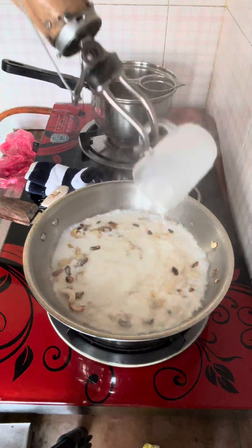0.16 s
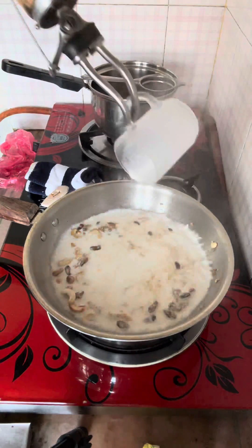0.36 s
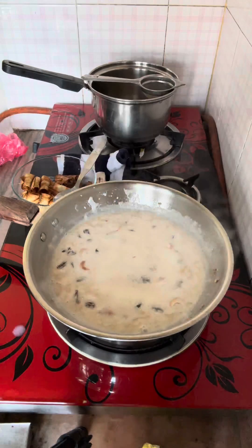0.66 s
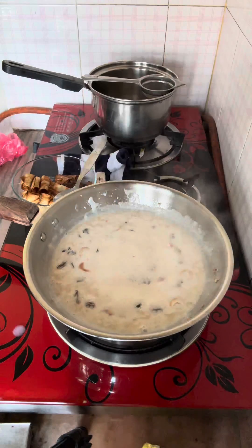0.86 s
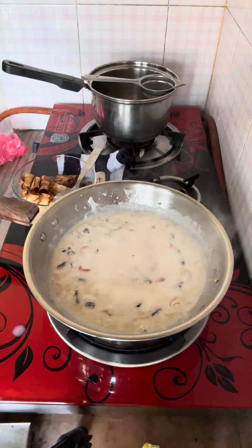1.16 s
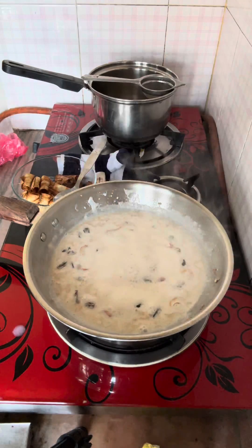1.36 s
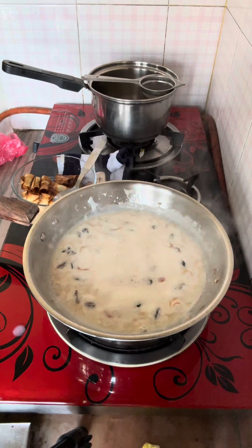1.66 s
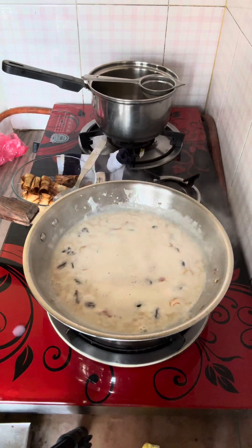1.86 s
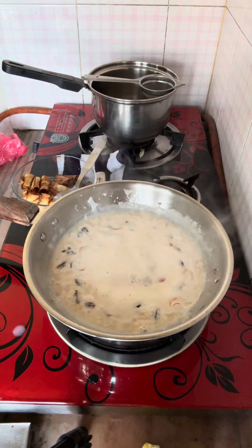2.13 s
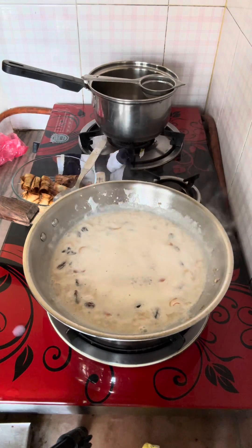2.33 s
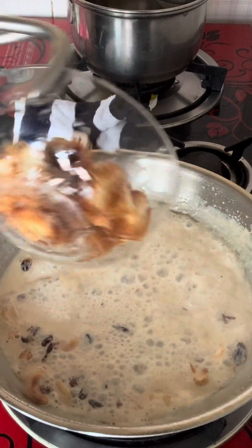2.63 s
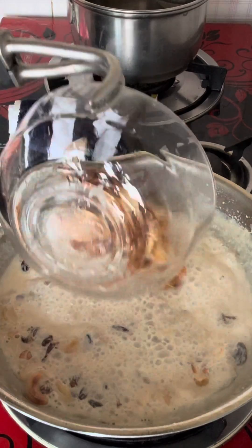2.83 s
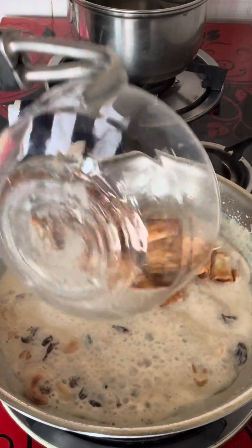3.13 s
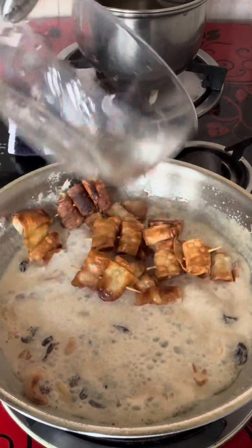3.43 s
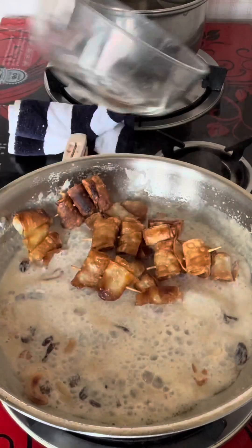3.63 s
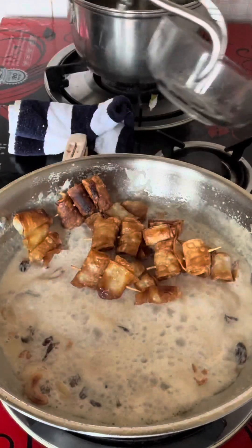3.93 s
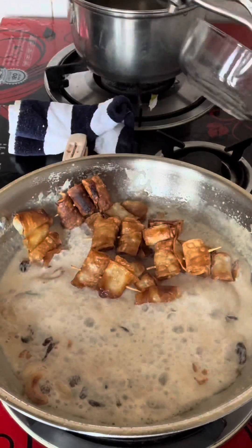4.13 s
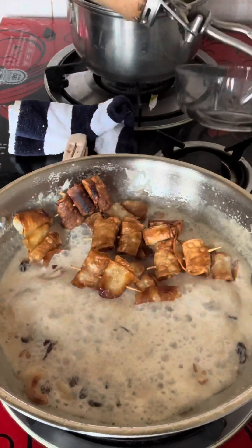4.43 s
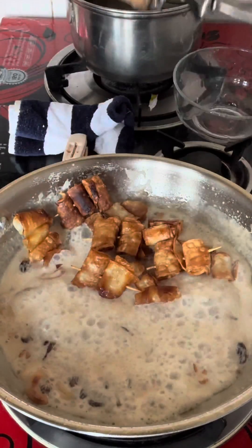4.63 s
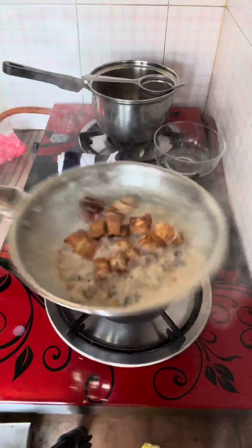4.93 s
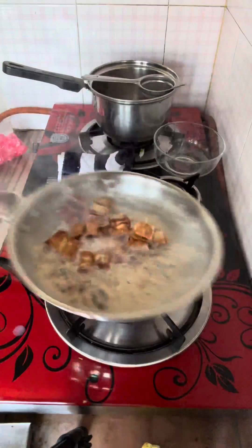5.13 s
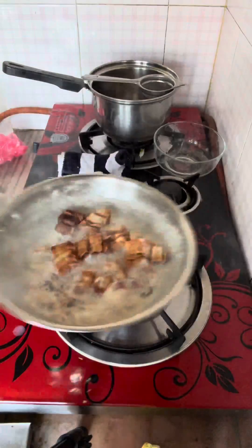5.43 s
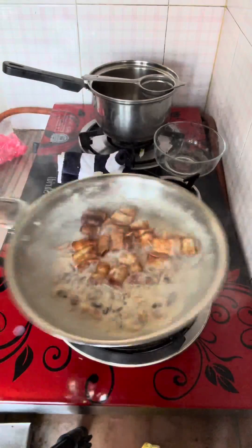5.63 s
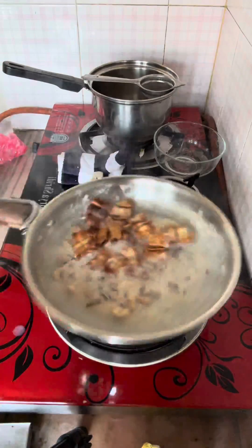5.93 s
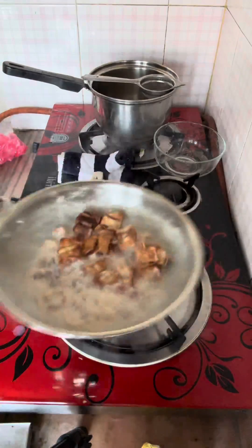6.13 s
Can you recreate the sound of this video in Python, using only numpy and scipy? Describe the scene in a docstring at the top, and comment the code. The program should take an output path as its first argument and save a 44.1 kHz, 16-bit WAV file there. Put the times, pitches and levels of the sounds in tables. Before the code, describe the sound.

Brief frying hiss, far thuds and drags, pieces knocking a glass bowl, very loud ringing set-down, then sloshing and a metal pan slamming on the stove.

```python
"""A bowl is set down hard by a steel grip and rings, after fried pieces slide out of it; in a home kitchen, four shots.
Blows are noisy contacts plus decaying modes, answered by a small hard room; a pan also bangs on the burner.
Dull knocks and drags on a far counter are softer blows and gritty noise; milk hisses in a hot pan as noise,
ticks and damped sines. Appliances hum in narrow noise bands, a vehicle revs outside as unsteady sine orders,
and the loudest blows overload the microphone."""
import sys
import numpy as np
from scipy import signal
from scipy.fft import rfft, irfft, next_fast_len
from scipy.io import wavfile
from scipy.ndimage import uniform_filter1d

SR = 44100
rng = np.random.default_rng(int(sys.argv[2]) if len(sys.argv) > 2 else 0)


def store_wav(level_fs):
    """Save 16-bit WAV to argv[1]."""
    pcm = np.round(np.clip(np.atleast_2d(level_fs), -1, 1) * 32767)
    wavfile.write(sys.argv[1], SR, pcm.T.astype(np.int16))


def how_loud(loudness_db):
    """Turn decibels into a plain amplitude multiplier (0 dB gives 1, 20 dB gives 10)."""
    steps = np.asarray(loudness_db, float) / 20
    return 10 ** steps


N = 276948
TIME = np.arange(N) / SR


def unit(x):
    """Scales to rms 1."""
    return x / np.sqrt(np.mean(x ** 2) + 1e-20)


def along(points, hz):
    """Interpolates (f/Hz, value) points on a log frequency axis."""
    f, v = np.transpose(points)
    return np.interp(np.log(hz + 1), np.log(f + 1), v)


def filtered(x, response):
    """Multiplies the spectrum of x by a response of frequency."""
    m = next_fast_len(len(x) + 8192)
    return irfft(rfft(x, m) * response(np.fft.rfftfreq(m, 1 / SR)), m)[:len(x)]


def narrow(hz, width_hz):
    """Noise of rms 1 in one narrow band; width at half amplitude."""
    return unit(filtered(rng.standard_normal(N), lambda f: 1 / (1 + ((f - hz) / width_hz * 2) ** 2)))


def bands(rows):
    """Sum of narrow noise bands from (f/Hz, width/Hz, level/dB) rows."""
    return sum(how_loud(db) * narrow(hz, width_hz) for hz, width_hz, db in rows)


def gritty(tone, per_second, spread_db, share):
    """Noise mixed with random ticks of uneven size, in one colour, rms 1."""
    signs = rng.choice([-1, 1], N)
    ticks = (rng.random(N) < per_second / SR) * signs * how_loud(spread_db * rng.standard_normal(N))
    mix = share * unit(ticks) + rng.standard_normal(N)
    return unit(filtered(mix, lambda hz: how_loud(along(tone, hz))))


def level(rows):
    """Gain per sample from (t/s, level/dB) rows, with soft ends and near silence outside."""
    s, db = np.transpose(rows)[:2]
    return how_loud(np.interp(TIME, np.r_[s[0] - .01, s, s[-1] + .02], np.r_[-110, db, -110]))


def strokes(rows, drop_db):
    """Gain of strokes with rounded tops, drop_db lower at both ends."""
    shape = np.linspace(-1, 1, 9)
    gain = 0
    for start, top, end, db in rows:
        s = top + np.where(shape < 0, top - start, end - top) * shape
        gain = gain + level(np.c_[s, db - drop_db * shape ** 2])
    return gain


# shot boundaries: t/s
SHOTS = [0, .459, 2.555, 4.761, 6.28]


def shot(index):
    """1 inside a shot, 0 elsewhere."""
    return (TIME >= SHOTS[index]) * (TIME < SHOTS[index + 1])


def add(out, s, sound):
    """Lays a sound down at s; it stops where its shot ends."""
    start, end = round(s * SR), round(SHOTS[np.searchsorted(SHOTS, s)] * SR)
    out[start:end][:len(sound)] += sound[:end - start]


# small hard room: f/Hz, t60/s
ROOM = [(80, 0.043), (210, 0.33), (560, 0.24), (1470, 0.19), (3880, 0.14), (10200, 0.041)]


def room_tail(t, linger):
    """Reverberant noise with a new uneven decay in each band, linger times the room's t60."""
    hz, frame_s, z = signal.stft(rng.standard_normal(len(t)), SR, nperseg=256)
    patches = uniform_filter1d(rng.standard_normal(z.shape), size=2, axis=0)
    patches = unit(uniform_filter1d(patches, size=6, axis=1))
    decay_db = 60 * frame_s / along(ROOM, hz)[:, None] / linger
    tail = signal.istft(z * how_loud(3.34 * patches - decay_db), SR, nperseg=256)[1][:len(t)]
    return tail * (1 - np.exp(-t / 0.0088))  # reflections take a few ms to build up


FAVOUR_DB, FAVOUR_OCTAVES = 6.5, .22  # lift of modes near the favoured pitch, and its reach


def mode_ring(modes, t, blur_hz, tilt_db, favoured_hz):
    """Decaying modes smeared by phase drift; strike place tilts them around 1 kHz or favours one pitch."""
    walk = rng.standard_normal((len(modes), len(t)))
    drift = np.cumsum(walk, axis=1) * np.sqrt(2 * np.pi * blur_hz / SR)
    drift = uniform_filter1d(uniform_filter1d(drift, size=40, axis=1), size=40, axis=1)
    ring = 0
    for (hz, db, t60_s), phase in zip(modes, drift):
        favour = FAVOUR_DB * np.exp(-(np.log2(hz / favoured_hz) / FAVOUR_OCTAVES) ** 2)
        start_db = db + tilt_db * np.log2(hz / 1000) + favour + rng.standard_normal()
        ring = ring + how_loud(start_db - 60 * t / t60_s) * np.sin(2 * np.pi * hz * t + phase)
    return ring


def blows(table, modes, bass_db, treble_db, ring_db, room_db, contact_s, tail_loss_10k_db, blur_hz, linger,
          tilt_db=0, favoured_hz=1):
    """Each blow is a short noisy contact, the object's modes and a duller room tail, set relative to its level."""
    out, t = np.zeros(N), np.arange(SR * 3 // 5) / SR
    rows = np.broadcast(*np.transpose(table)[:2], bass_db, treble_db, ring_db, room_db, tilt_db, favoured_hz)
    for s, db, bass, treble, ringing, room, tilt, favoured in rows:
        colour = np.array([(40, bass - 14), (150, bass + 10.5), (1200, 0), (3600, 0.49 * treble - 3),
                           (6500, treble - 6), (16000, 2.0 * treble - 24)])
        rise = 1 - np.exp(-t / (0.31 * contact_s))
        burst = 3 * rng.standard_normal(len(t)) * np.exp(-t / contact_s)
        contact = filtered(burst, lambda f: how_loud(along(colour, f)))
        tail = filtered(how_loud(room) * room_tail(t, linger),
                        lambda f: how_loud(along(colour, f) - tail_loss_10k_db * f / 10 ** 4))
        ring = how_loud(ringing) * mode_ring(modes, t, blur_hz, tilt, favoured)
        add(out, s, how_loud(db) * rise * (contact + tail + ring))
    return out


# bowl onto stove: t/s, level/dB, bass/dB, treble/dB, room/dB (before a common -3.5)
SET_DOWN = [(4.333, 15.5, -21, -11, 6), (4.627, -0.3, 1.5, -2, -3.5), (4.684, 5, -2, -22.5, 5)]
# stove modes: f/Hz, level/dB, t60/s
STOVE = [(132, -18, 0.52), (270.4, -9, 0.26), (427, -14, 0.32), (495.5, -8.5, 0.21), (656, -13, 0.38),
         (976, -11, 0.18), (1056.6, -11, 0.17), (1411, -4.5, 0.18), (1690, -3.5, 0.15), (1976, -4.5, .14),
         (2073, 0.5, 0.14), (2340, -6, .17), (2760, -13, 0.19), (3410, -15.5, 0.19)]


def set_down():
    """The bowl lands hard and excites the stove's modes."""
    bass_db, treble_db, room_db = np.transpose(SET_DOWN)[2:]
    return blows(SET_DOWN, STOVE, bass_db, treble_db, ring_db=-13.5, room_db=room_db - 3.5, contact_s=0.0028,
                 tail_loss_10k_db=6.5, blur_hz=4.3, linger=0.98)


# free strikes: t/s, level/dB, favoured f/Hz, loss one octave away/dB (grows with octaves squared)
FREE = [(4.628, 0.11, 1994, 0.1), (4.685, 15.56, 2326, 33)]
# empty bowl modes: f/Hz, level/dB, t60/s
BOWL = [(936, 0.1, 1.4), (2054, -15, 0.66), (5059, -9.5, 0.2), (3420, -28, 0.5), (6820, -15, 0.052)]


def bowl():
    """The empty glass bowl rings in clear modes; strike place decides which it favours."""
    out, t = np.zeros(N), np.arange(SR // 4) / SR
    for s, strike_db, favoured_hz, narrow_db in FREE:
        ring = 0
        for hz, db, t60_s in BOWL:
            start_db = db - narrow_db * np.log2(hz / favoured_hz) ** 2
            ring = ring + how_loud(start_db - 60 * t / t60_s) * np.sin(2 * np.pi * hz * t)
        add(out, s, how_loud(strike_db) * ring * (1 - np.exp(-t / 0.0015)))
    return out


# foot contacts: t/s, level/dB, treble/dB, ring/dB, favoured f/Hz
TAPS = [(4.4856, 4.5, -21.5, -17, 2200), (4.5294, 4.5, -13, -14, 1700), (4.59, -14, -52.5, -9.5, 1220),
        (4.595, -6, -50, -9, 1300), (4.601, 2, -39.5, -10, 1980)]
# foot modes: f/Hz, level/dB, t60/s
FOOT = [(137.5, -7, 0.5), (257, -8, .15), (1220, -1.5, 0.045), (1420, -2, 0.045), (1769, -1, 0.06),
        (2000, -4, .03), (2248, -6, 0.09), (6300, -30, 0.1), (9000, -46, .09), (11700, -49, .09)]


def foot_taps():
    """The bowl rocks on its foot in very short contacts."""
    treble_db, ring_db, favoured_hz = np.transpose(TAPS)[2:]
    return blows(TAPS, FOOT, -20.0, treble_db, ring_db, room_db=-3.5, contact_s=0.0011, tail_loss_10k_db=17.0,
                 blur_hz=25, linger=0.9, favoured_hz=favoured_hz)


# thin high chink: t/s, level/dB
CHINK = [(4.557, -42.5)]
# its modes: f/Hz, level/dB, t60/s
CHINK_RING = [(2650, -4, .03), (5055, -7, .2), (5350, 2.5, .03)]


def chink():
    """A thin chink, nearly all high modes."""
    return blows(CHINK, CHINK_RING, bass_db=-25.5, treble_db=-2.0, ring_db=21.5, room_db=-9, contact_s=.003,
                 tail_loss_10k_db=8.5, blur_hz=1.5, linger=.6)


# grip clinks: t/s, level/dB
CLINKS = [(3.142, -31.5)]
# steel grip modes: f/Hz, level/dB, t60/s
GRIP = [(775, -4, .7), (1378, -4, .2), (2121, 0, .55), (2988, -4, .33)]


def grip_clinks():
    """The steel grip clinks with little phase blur."""
    return blows(CLINKS, GRIP, bass_db=-8.0, treble_db=-18.0, ring_db=-11.0, room_db=-3.5, contact_s=0.005,
                 tail_loss_10k_db=8, blur_hz=0.39, linger=2.3)


RATTLE_S, RATTLE_DB, RATTLE_LOSS_DB = 4.047, -35.5, 1.2  # first contact, its mean level, loss per contact
FIRST_GAP_S, GAP_RATIO, LEAST_GAP_S = .056, .66, .014


def chatter(count):
    """Contacts (t/s, level/dB) whose gaps shrink to a steady buzz."""
    k = np.arange(count)
    gaps_s = np.maximum(FIRST_GAP_S * GAP_RATIO ** k, LEAST_GAP_S)
    db = RATTLE_DB - RATTLE_LOSS_DB * k + .8 * rng.standard_normal(count)
    return np.c_[RATTLE_S + np.cumsum(gaps_s) - gaps_s, db]


# loose part modes: f/Hz, level/dB, t60/s
LOOSE_PART = [(1100, 0, .035), (2800, -3, .025), (6200, -18, .04)]


def rattle():
    """A loose part chatters ever faster, then evenly, as the bowl is lowered."""
    return blows(chatter(count=9), LOOSE_PART, bass_db=-35.5, treble_db=-28, ring_db=-4.0, room_db=-6,
                 contact_s=0.0057, tail_loss_10k_db=9, blur_hz=86, linger=.4)


# pieces on the tipped bowl: t/s, level/dB, treble/dB, ring/dB, favoured f/Hz
TUMBLE = [(2.622, -29.5, -46, -38, 800), (2.814, -47, 6, -17, 4120), (2.841, -27.5, -14, -10, 3500),
          (2.849, -22.5, -14, -13, 1380), (2.87, -18.5, -17, -8, 1380), (2.876, -18.5, -7, -5.5, 3120),
          (2.894, -27.5, -1.5, -2, 1380), (2.903, -14, -14, -6, 786), (2.921, -18.5, -18, -12, 786),
          (2.949, -19.5, -7, -9, 5400), (2.964, -18.5, -16, -5, 2960), (3.072, -30, -7.5, -14, 3500)]
# full bowl modes: f/Hz, level/dB, t60/s
FULL_BOWL = [(786, 1, 0.17), (1380, 1, 0.086), (2825, -8, 0.037), (3120, -8, 0.022), (3500, -9, 0.033),
             (4120, -8, 0.034), (5400, -19, 0.038)]


def tumble():
    """Pieces knock the tipped bowl, whose modes die fast."""
    treble_db, ring_db, favoured_hz = np.transpose(TUMBLE)[2:]
    return blows(TUMBLE, FULL_BOWL, -21, treble_db, ring_db, room_db=-0.5, contact_s=0.0028, tail_loss_10k_db=3,
                 blur_hz=10.5, linger=1.0, favoured_hz=favoured_hz)


# food on glass: start/s, top/s, end/s, top level/dB (before jerks)
SLIDE = [(2.55, 2.75, 2.92, -48), (2.83, 2.9, 3.024, -44.5)]
# friction colour: f/Hz, relative density/dB
SLIDE_TONE = [(900, -30), (1800, -4.5), (4200, 2), (6000, -9.5), (10000, -16), (15500, -24.5)]
# glass bands: f/Hz, width/Hz, level/dB
SLIDE_RING = [(1900, 170, -5.5), (3810, 390, -10)]


def slide():
    """Food slides on glass: gritty noise and glass bands, jerked by stick and slip."""
    jerks = how_loud(3 * narrow(0, 70))
    grit = gritty(SLIDE_TONE, per_second=230, spread_db=5.5, share=0.71)
    return strokes(SLIDE, drop_db=25.5) * jerks * (grit + bands(SLIDE_RING))


# pan clips burner and bounces: t/s, level/dB, treble/dB, ring/dB
BANGS = [(5.543, -9, -5.5, -1), (5.556, -13, -20, -38)]
# pan modes: f/Hz, level/dB, t60/s
PAN = [(83, -8, .5), (131, -4, .41), (415, 0, .29), (514, -3, .22), (808, -5, .18), (924, -11, .25),
       (1685, -25, 1.2), (1717, -11, .17), (2037, -23, .45), (2428, -21, .23), (4048, -37, .4),
       (4592, -41, .5), (6406, -31, .2), (6508, -32, .3), (7273, -36, .33)]


def pan_bangs():
    """The pan clips the burner and bounces, ringing its modes."""
    treble_db, ring_db = np.transpose(BANGS)[2:]
    return blows(BANGS, PAN, -13.5, treble_db, ring_db, room_db=5.0, contact_s=0.0044, tail_loss_10k_db=17.5,
                 blur_hz=2.1, linger=1.28)


# pan lands flat: t/s, level/dB
SLAM = [(6.127, 6)]
# pan pressed on the grate, modes: f/Hz, level/dB, t60/s
SEATED = [(124, -15, .3), (657, -10, .3), (413, -7, .4), (491, 0, .23), (603, -4, .22), (929, -3, .19),
          (1071, -4, .1), (1803, -7, .16), (2252, -9, .19), (2756, -14, .16), (3480, -15, .14),
          (3682, -15, .16)]


def pan_slam():
    """The pan lands flat and rings as pressed on the grate."""
    return blows(SLAM, SEATED, bass_db=-13.5, treble_db=-13.0, ring_db=-5.0, room_db=5.0, contact_s=0.003,
                 tail_loss_10k_db=6.0, blur_hz=11, linger=1.2)


# hard blows on the stove: t/s, level per mode/dB, base t60/s
CRASHES = [(4.334, -26, 0.19), (5.545, -53.5, 0.29), (6.128, -28.5, 0.21)]
# clearest steel modes: f/Hz, level/dB (before scatter), t60 over base
STEEL_TOP = [(3284, 2, 1.3), (6005, -7, 1.35), (6700, -3, 1.0), (9590, -16, 1.3)]
DENSE_LOW_HZ, DENSE_HIGH_HZ, DENSE_TILT_DB = 2504, 15470, -11  # crowd of weaker modes; tilt per octave
DENSE_SCATTER_DB, T60_SPREAD, T60_FALL = 4, .15, .15  # level spread, log t60 spread, t60 power of falling with f


def stove_top(count):
    """A crowd of close steel modes, uneven in level and decay, shimmers after each hard blow."""
    out, t = np.zeros(N), np.arange(SR // 4) / SR
    crowd_hz = DENSE_LOW_HZ + (DENSE_HIGH_HZ - DENSE_LOW_HZ) * rng.random(count)
    ratio = crowd_hz / DENSE_LOW_HZ
    crowd_stretch = np.exp(T60_SPREAD * rng.standard_normal(count)) * ratio ** -T60_FALL
    crowd = np.c_[crowd_hz, DENSE_TILT_DB * np.log2(ratio), crowd_stretch]
    hz, db, stretch = np.r_[crowd, STEEL_TOP].T[:, :, None]
    for s, crash_db, t60_s in CRASHES:
        scatter_db = DENSE_SCATTER_DB * rng.standard_normal(hz.shape)
        phase = 2 * np.pi * rng.random(hz.shape)
        decay = how_loud(db + scatter_db - 60 * t / (t60_s * stretch))
        ring = np.sum(decay * np.sin(2 * np.pi * hz * t + phase), axis=0)
        add(out, s, how_loud(crash_db) * ring * (1 - np.exp(-t / 0.0019)))
    return out


# small steel ticks: t/s, level/dB, treble/dB, room/dB
TICKS = [(4.009, -46, -2, 3), (5.201, -33.5, -35, 6), (5.385, -25.5, -18, 4), (5.392, -19.5, -83, 3.5),
         (6.008, -29, -32, 0)]
# loose steel modes: f/Hz, level/dB, t60/s
HOOK = [(599, -4, 0.088), (1046, 1.5, 0.032), (2020, -22, 0.28), (2970, -10, 0.047), (5060, -21, 0.068)]


def steel_ticks():
    """Small loose steel parts tick in very short contacts."""
    treble_db, room_db = np.transpose(TICKS)[2:]
    return blows(TICKS, HOOK, -23.0, treble_db, -11.5, room_db, contact_s=0.0012, tail_loss_10k_db=20,
                 blur_hz=40.7, linger=0.8)


# shaken contents: start/s, top/s, end/s, top level/dB
SLOSH = [(5.14, 5.2, 5.26, -55.5), (5.73, 5.92, 6.09, -51.5)]
# slosh colour: f/Hz, relative density/dB
SLOSH_TONE = [(350, -31), (600, 1.5), (1830, -4), (4350, -6), (12000, -32.5), (15600, -81)]


def slosh():
    """The shaken pan's contents slosh: swells of dense gritty noise."""
    return strokes(SLOSH, drop_db=20) * gritty(SLOSH_TONE, per_second=1100, spread_db=5.0, share=0.81)


BUBBLE_HZ, BUBBLE_SPREAD, BUBBLE_CYCLES = 1880, 0.44, 6.5  # median pitch, log spread, life


def bubbles(count):
    """Small bubbles burst in the first shot: damped sines of scattered pitch and size, rms 1."""
    when, pitch, size = rng.random(count), rng.standard_normal(count), rng.exponential(size=count)
    hz, n = BUBBLE_HZ * np.exp(BUBBLE_SPREAD * pitch)[:, None], np.arange(1024)
    cycles = hz * n / SR
    envelope = cycles * np.exp(-3 * cycles / BUBBLE_CYCLES)
    grains = how_loud(3 * size)[:, None] * np.sin(2 * np.pi * cycles) * envelope
    places = (when * SHOTS[1] * SR).astype(int)[:, None] + n
    out = np.bincount(places.ravel(), grains.ravel(), N)
    return out / np.std(out[:round(SHOTS[1] * SR)])


# hiss: t/s, level/dB
FRYING = [(0.0, -30), (0.455, -33)]
# hiss colour: f/Hz, relative density/dB
FRY_TONE = [(200, -14.5), (507, -0.5), (566, -6), (680, -2), (1070, -6.5), (1220, -1), (2530, -5),
            (3040, -3), (6910, -21), (13100, -26), (15700, -36)]


def frying():
    """Cold milk on hot steel: dense fine spitting and bursting bubbles."""
    spitting = gritty(FRY_TONE, per_second=1100, spread_db=1.5, share=0.65)
    return shot(0) * level(FRYING) * (spitting + how_loud(-14) * bubbles(count=300))


# counter knocks: t/s, level/dB, weight/dB (adds bass and ring), treble/dB
THUDS = [(0.508, -33.5, -37, -58), (0.851, -25, -3.5, -30), (0.861, -26.5, -0.5, -10),
         (0.871, -20, 0.5, -26), (0.898, -36.5, -4, -7.5), (1.07, -42, -11, -21), (1.167, -43.5, 9, -53),
         (1.221, -32, 0, -51), (1.434, -37.5, -5, -37), (1.524, -35, 10.5, -36), (1.718, -36, -1.5, -31),
         (1.831, -37.5, 4, -44), (1.902, -25, -15, -78), (2.332, -29, -5, -37), (2.49, -35, -51, -34),
         (3.464, -50, -2.5, -28)]
# counter modes: f/Hz, level/dB, t60/s
COUNTER = [(109.7, 2, 0.77), (185.5, 0.5, 0.47), (231.3, 4, 0.48), (279, -13, 0.26), (413, -9.5, .3),
           (514, -6.5, 0.38), (655, -6.5, 0.2), (759, -1.5, 0.19), (940, -8.5, 0.2)]
RING_PER_WEIGHT = 0.31  # dB per dB
LIGHT_TILT, FIRM_DB = 0.061, -20.5  # upper-mode tilt: dB per octave for each dB under a firm knock


def counter_thuds():
    """Dull far knocks; weight rings the counter more, lighter ones favour its upper modes."""
    peak_db, weight_db, treble_db = np.transpose(THUDS)[1:]
    return blows(THUDS, COUNTER, weight_db, treble_db, ring_db=-0.5 + RING_PER_WEIGHT * weight_db, room_db=6.5,
                 contact_s=0.0057, tail_loss_10k_db=0.5, blur_hz=2.75, linger=1.26,
                 tilt_db=LIGHT_TILT * (FIRM_DB - peak_db))


# far hard object: t/s, level/dB, favoured f/Hz
KNOCK = [(2.207, -30.5, 2310), (2.218, -35, 1500), (2.229, -35.5, 2050)]
# its modes: f/Hz, level/dB, t60/s
HARD = [(718, -5.5, 0.11), (808, -1.5, 0.13), (1050, -5, 0.12), (1550, 0.5, 0.11), (1930, -4, .22),
        (2051, -6.5, .25), (2230, -9, 0.14), (2370, -14.5, 0.27), (3520, -16, .17)]


def hard_knock():
    """A harder object struck further off rattles in short blurred blows."""
    return blows(KNOCK, HARD, bass_db=-13.5, treble_db=2.5, ring_db=-0.5, room_db=8.0, contact_s=0.0021,
                 tail_loss_10k_db=16, blur_hz=41, linger=1.3, favoured_hz=np.transpose(KNOCK)[2])


# heavy pull along the counter: start/s, top/s, end/s, top level/dB
DRAG = [(1.15, 1.215, 1.33, -41.5), (1.41, 1.46, 1.53, -42), (1.79, 1.92, 2.072, -34.5),
        (2.44, 2.53, 3.3, -44)]
# drag colour: f/Hz, relative density/dB
DRAG_TONE = [(47, -17), (80, -30.5), (114, 7.5), (163, -10.5), (238, -3.5), (347, -37.5), (990, -16.5),
             (1440, -20), (12000, -61), (15600, -100)]
# ringing band: f/Hz, width/Hz, level/dB
DRAG_RING = [(772, 63, -11)]


def drag():
    """Something heavy rubs along the counter: sparse gritty noise and a ringing band."""
    grit = gritty(DRAG_TONE, per_second=74, spread_db=0.0, share=0.39)
    return shot(1) * strokes(DRAG, drop_db=19.5) * (grit + bands(DRAG_RING))


# airy squeaks: start/s, top/s, end/s, top level/dB
SQUEAK = [(2.004, 2.073, 2.19, -60.5), (2.366, 2.486, 3.8, -59.5)]
# sliding bands: start f/Hz, end f/Hz, width/Hz, level/dB
SQUEAK_TONE = [(2620, 2690, 100, -9), (2870, 3010, 130, -4), (3190, 3390, 170, -1.5)]
SQUEAK_SLIDE_S = .045


def squeak():
    """Faint friction squeaks: narrow noise bands slide up to their pitch."""
    starts = np.transpose(SQUEAK)[0]
    since_s = np.abs(TIME - starts[np.clip(np.searchsorted(starts, TIME) - 1, 0, None)])
    slid = 1 - np.exp(-(since_s / SQUEAK_SLIDE_S) ** 2)
    tone = 0
    for low_hz, high_hz, width_hz, db in SQUEAK_TONE:
        cycles = np.cumsum(low_hz + (high_hz - low_hz) * slid) / SR
        tone = tone + how_loud(db) * narrow(0, width_hz) * np.sin(2 * np.pi * cycles)
    return shot(1) * strokes(SQUEAK, drop_db=3) * unit(tone)


# vehicle outside: t/s, firing f/Hz, level/dB
ENGINE = [(4.771, 42, -43.5), (4.951, 49.95, -45), (5.15, 55, -44.5), (5.4, 51.9, -48.5),
          (5.599, 49.7, -40), (5.9, 47.15, -49.5), (6.28, 44.2, -48.5)]
# firing orders: multiple, level/dB
ORDERS_OUT = [(1, 4), (2, -9.5), (4, -11.5)]


def engine():
    """Low firing orders of a far revving engine, each a little unsteady in level."""
    s, hz, db = np.transpose(ENGINE)
    phase = 2 * np.pi * np.cumsum(np.interp(TIME, s, hz)) / SR
    orders = 0
    for multiple, order_db in ORDERS_OUT:
        orders = orders + how_loud(order_db + 2 * narrow(0, 3.8)) * np.sqrt(2) * np.sin(multiple * phase)
    return shot(3) * how_loud(np.interp(TIME, s, db)) * orders


# pan still ringing as the last shot opens: f/Hz, level/dB, t60/s
AFTER_RING = (1800, -60, .6)


def after_ring():
    """A decaying narrow band: the pan still rings."""
    hz, db, t60_s = AFTER_RING
    return how_loud(db - 60 * np.abs(TIME - SHOTS[3]) / t60_s) * shot(3) * narrow(hz, 16)


# background noise colour in each of the last three shots: f/Hz, relative density/dB
NOISE_TONE = [
    [(150, -36), (250, -15), (695, -4.5), (1000, -13.5), (1210, -9), (1800, -7), (2550, -18.5), (5950, -32),
     (15700, -45)],
    [(150, -55.5), (250, -18.5), (518, -6.5), (870, -9), (1130, -9.5), (1680, -8.5), (2180, -13.5),
     (15700, -55.5)],
    [(150, -30.5), (250, -21), (313, -6), (527, 3), (798, 1.5), (1830, -2.5), (4920, -20.5), (6160, -28),
     (15700, -38)],
]
# background noise in the same shots, swelling with room reverberation around the blows: t/s, level/dB
NOISE_LEVEL = [
    [(0.48, -60), (1.4, -59), (1.89, -55.5), (2.55, -58)],
    [(2.57, -58), (2.95, -44.5), (3.22, -58), (4.1, -55.5), (4.32, -58)],
    [(4.78, -53), (5.44, -54.5), (5.592, -48.5), (5.988, -53.5), (6.12, -54)],
]


def background_noise():
    """Gritty background noise, coloured for each shot, swells with room reverberation around the blows."""
    out = np.zeros(N)
    for index, (tone, rows) in enumerate(zip(NOISE_TONE, NOISE_LEVEL)):
        gain = how_loud(np.interp(TIME, *np.transpose(rows)))
        out += shot(index + 1) * gain * gritty(tone, per_second=250, spread_db=2.5, share=0.5)
    return out


# appliance hum in each shot: f/Hz, width/Hz, level/dB rms
HUM = [
    [(34.4, 24, -48.5), (119, 20, -46.5), (182, 88, -53.5)],
    [(34.5, 24, -54), (115, 29, -57), (6120, 290, -80)],
    [(35, 15, -47), (135.6, 39, -50.5), (77, 44, -57.5), (215.1, 31, -64.5), (6150, 300, -82.5)],
    [(30.6, 12, -55), (55, 27, -53.5), (135.5, 10.6, -54), (207, 51, -58), (6100, 310, -77)],
]


def hum():
    """Appliances hum in wavering narrow bands that differ from shot to shot."""
    return sum(shot(index) * bands(rows) for index, rows in enumerate(HUM))


def scene():
    """All sources, heard by one microphone."""
    out = set_down() + bowl() + foot_taps() + chink() + grip_clinks() + rattle() + tumble() + slide()
    out += pan_bangs() + pan_slam() + stove_top(count=900) + steel_ticks() + slosh()
    out += frying() + counter_thuds() + hard_knock() + drag() + squeak()
    out += engine() + after_ring() + background_noise() + hum()
    return out[None]


# microphone hiss colour: f/Hz, relative density/dB
MIC_HISS = [(2500, -120), (4000, -1), (14500, 0), (15800, -40.5)]


def mic_hiss():
    """Faint microphone hiss: coloured noise without ticks."""
    return how_loud(-75.0) * gritty(MIC_HISS, per_second=0, spread_db=0, share=0)


def top_cut(x):
    """Nothing passes above the cut-off."""
    return signal.sosfilt(signal.butter(12, 15860, fs=SR, output="sos"), x)


def record(dry):
    """The microphone hisses faintly and clips near full scale; joins fade out fast and in slowly."""
    dry = dry + mic_hiss()
    mix = dry / (1 + np.abs(dry / .99) ** 24) ** (1 / 24)
    for s in SHOTS[1:-1]:
        mix = mix * np.clip(np.maximum((s - TIME) / .002, (TIME - s) / .015), 0, 1)
    return top_cut(mix)


dry = scene()
out = record(dry)
store_wav(out)
```